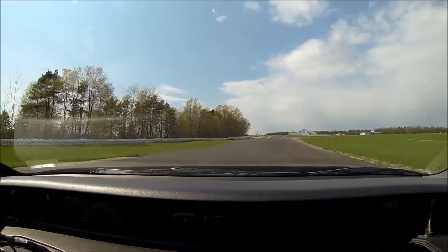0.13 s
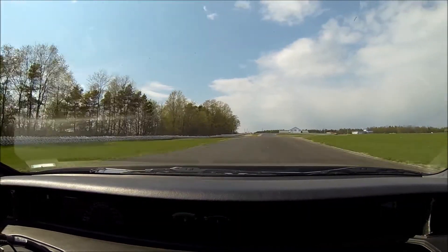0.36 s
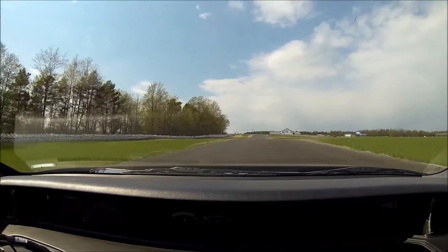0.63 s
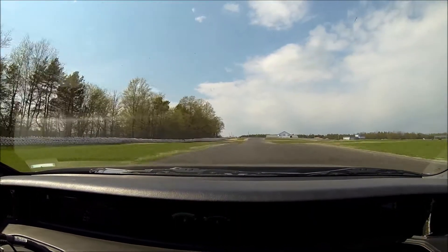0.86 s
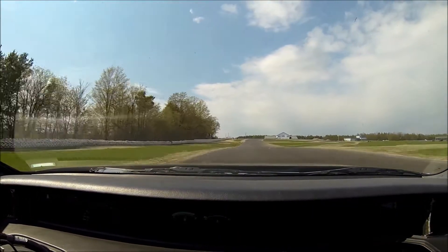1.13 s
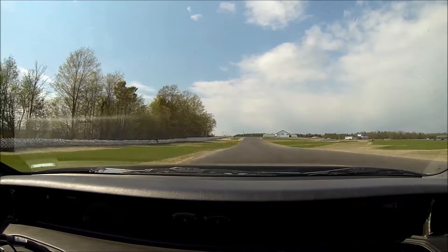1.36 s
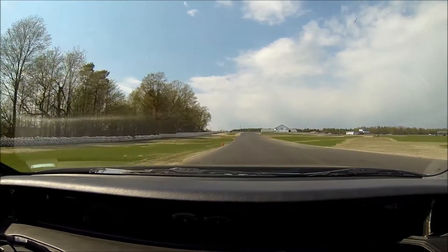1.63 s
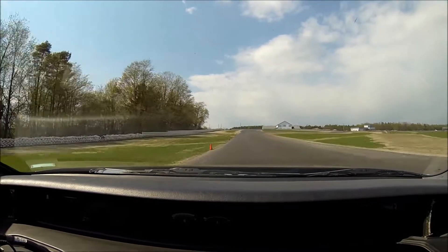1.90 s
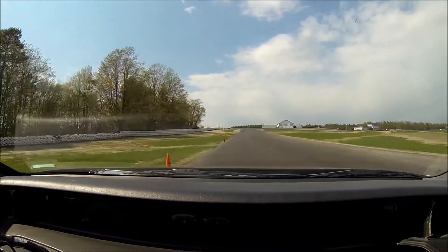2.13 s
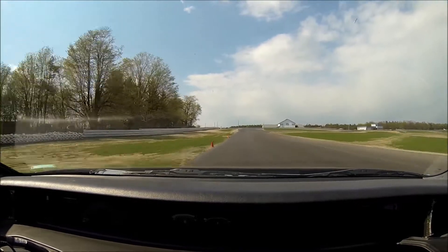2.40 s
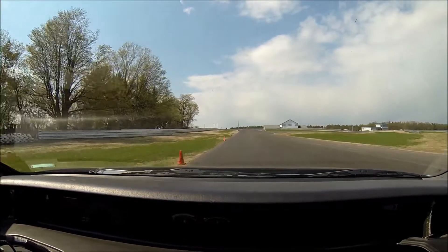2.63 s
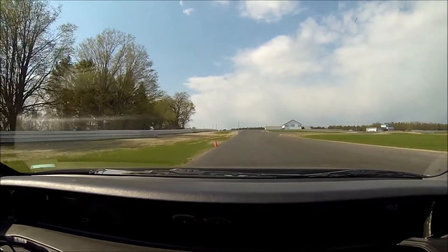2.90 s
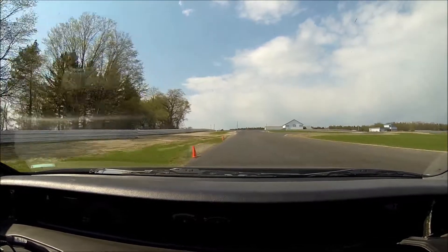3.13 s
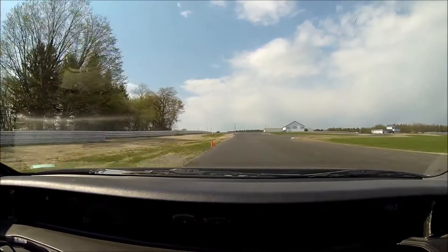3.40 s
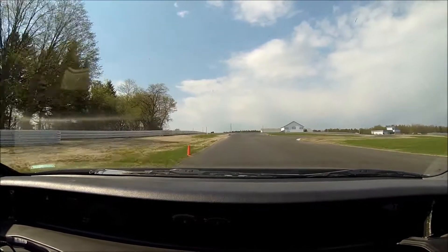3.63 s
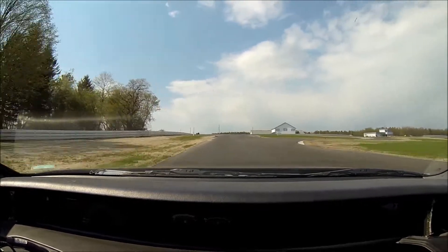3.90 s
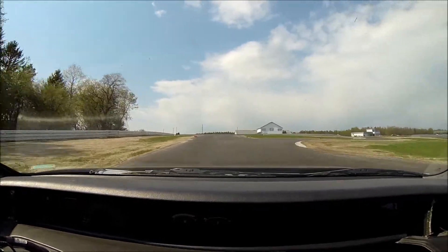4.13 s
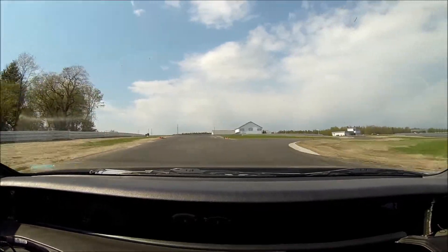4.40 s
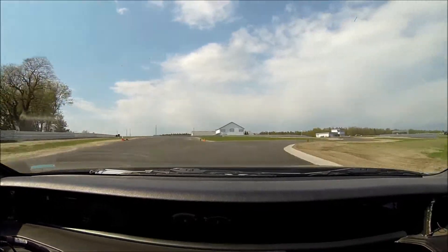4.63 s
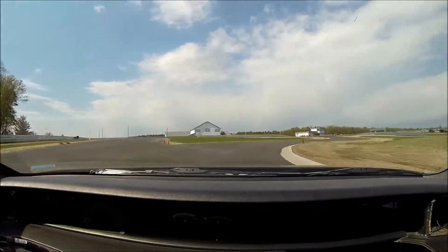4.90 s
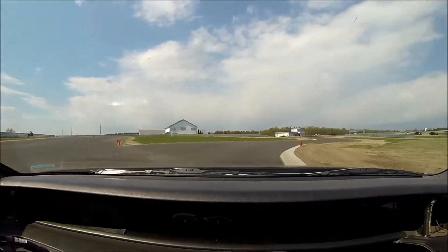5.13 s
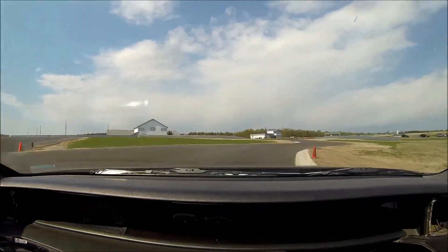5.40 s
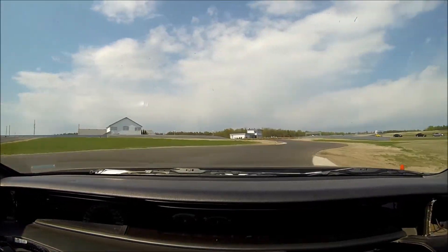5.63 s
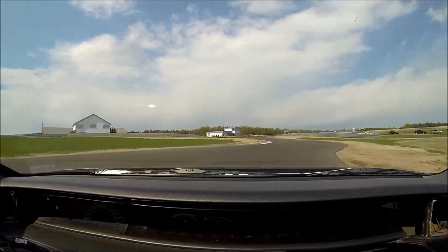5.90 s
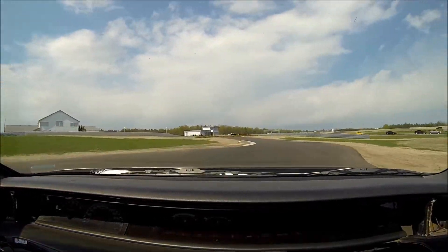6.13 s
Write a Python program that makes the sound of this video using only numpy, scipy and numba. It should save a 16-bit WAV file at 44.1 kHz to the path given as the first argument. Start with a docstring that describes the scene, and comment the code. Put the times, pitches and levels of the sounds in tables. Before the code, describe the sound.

Close, boomy cabin sound: loud raspy engine at full throttle, then an abrupt lift with a short burble and falling pitch. Very high, thin brake squeal accompanies slowing and a quick downshift blip. The engine settles into a steady lower drone as tyres begin to scrub, squeal and chirp. Road thumps and clicks throughout make the overloaded microphone level dip and swell back.

```python
"""Inside a four-cylinder car on a circuit: the engine pulls at full throttle over road rumble and gas noise.
The throttle shuts, the exhaust burbles up and the brakes squeal thinly; a blipped downshift drags the engine up.
Then the tyres scrub and chirp through a corner on the limit.
The engine is a sum of multiples of its cycle rate; squeals are tones in noise bands, the rest is shaped noise.
Jolts from the road push a gain control down throughout, and everything swells back after each."""
import sys
import numpy as np
from scipy import signal
from scipy.fft import rfft, irfft, next_fast_len
from scipy.io import wavfile
from scipy.ndimage import uniform_filter1d
from numba import njit

SR = 44100
rng = np.random.default_rng(int(sys.argv[2]) if len(sys.argv) > 2 else 0)


def generate_wav(signal):
    """Clip the signal to [-1, 1] and save it as 16-bit WAV at the path in sys.argv[1]."""
    frames = np.transpose(np.atleast_2d(signal))
    scaled = np.clip(frames, -1, 1) * 32767
    pcm = np.round(scaled).astype(np.int16)
    wavfile.write(sys.argv[1], SR, pcm)


def linear_from_db(decibels):
    """Turn decibels (scalar or array-like) into linear amplitude factors; 0 gives 1."""
    return 10 ** (np.asarray(decibels, float) / 20)


N = 276507
TIME = np.arange(N) / SR


def columns(table):
    """Linear interpolation: every column after the time becomes a value per sample."""
    s, *rest = np.transpose(table)
    return [np.interp(TIME, s, column) for column in rest]


def unit(x):
    """Normalisation: the signal scaled to rms 1."""
    return x / np.sqrt(np.mean(x ** 2))


def walk(rate):
    """Low-pass noise: random levels, rate per second, smoothed by two moving averages; rms 1."""
    hold = int(SR / rate)
    levels = np.repeat(rng.standard_normal(N // hold + 1), hold)
    smooth = uniform_filter1d(uniform_filter1d(levels, hold), hold)
    return unit(smooth[:N])


def coloured(points):
    """Spectral shaping: white noise filtered to a spectrum of (Hz, relative dB per Hz) points; rms 1."""
    size = next_fast_len(N)
    hz, db = np.transpose(points)
    bins_hz = np.arange(size // 2 + 1) * SR / size
    gain = linear_from_db(np.interp(np.log(bins_hz + 1), np.log(hz), db, right=-200))
    return unit(irfft(rfft(rng.standard_normal(size)) * gain, size)[:N])


def whine(hz, width_hz, rough):
    """Narrow-band noise: a steady tone on a moving pitch shares its power with a band around it."""
    turn = 2 * np.pi * np.cumsum(hz) / SR
    rough = np.clip(rough, 0, 1)  # share of the power in the noise band
    band = walk(width_hz) * np.cos(turn) + walk(width_hz) * np.sin(turn)
    steady = np.sin(turn + 2 * np.pi * rng.random())
    return np.sqrt(2 * (1 - rough)) * steady + np.sqrt(rough) * band


def bursts(table, waver):
    """Amplitude envelope: short tones swell and fade around their time, on a wavering pitch."""
    turn = 2 * np.pi * np.cumsum(waver) / SR
    out = np.zeros(N)
    for s, hz, length, db in table:
        span = slice(int((s - length) * SR), int((s + length) * SR))
        swell = np.exp(-(2 * (TIME[span] - s) / length) ** 4)
        out[span] += linear_from_db(db) * swell * np.sqrt(2) * np.sin(hz * turn[span])
    return out


def cabin_resonance():
    """Room modes: the gain of the cabin at each whole Hz, a sum of resonance peaks in dB."""
    # cabin resonances: centre_hz, width_hz, lift_db
    booms = [(281.8, 4.8, 6), (350.7, 8, 4.5), (478.8, 27.6, 11.5), (580, 12, 3.5), (1635, 220, 1.5)]
    scale = np.arange(3000.)
    return scale, linear_from_db(sum(db / (1 + (2 * (scale - f) / width) ** 2) for f, width, db in booms))


def engine():
    """Harmonic synthesis: cyclic firing sounds multiples of the cycle rate, governed by load and cabin modes."""
    # four-stroke cycle rate: start_s, rate_hz
    speed = [(0.0, 55.9), (0.2, 56.6), (0.33, 57.45), (0.47, 57.8), (0.55, 57.45), (0.68, 58.0),
             (0.96, 58.6), (1.1, 59.2), (1.24, 59.6), (1.33, 60.2), (1.53, 60.35), (1.58, 59.0),
             (1.65, 57.9), (1.72, 59.15), (1.87, 58.55), (1.95, 58.0), (2.2, 55.3), (2.3, 52.9),
             (2.42, 51.5), (2.52, 51.65), (2.72, 51.1), (2.84, 49.2), (3.05, 44.5), (3.16, 41.7),
             (3.25, 44.4), (3.34, 52.2), (3.41, 53.8), (3.56, 51.95), (3.84, 49.1), (4.0, 48.25),
             (4.15, 47.7), (4.28, 48.35), (4.4, 47.85), (4.48, 48.15), (4.61, 47.9), (4.68, 48.85),
             (4.75, 49.05), (4.88, 48.7), (4.99, 49.05), (5.15, 48.25), (5.24, 48.6), (5.36, 48.45),
             (5.47, 49.0), (5.6, 48.5), (5.95, 47.85), (6.27, 48.05)]
    # engine effort: start_s, load_db (relative to full throttle), firing_db (level of the firing tone)
    effort = [(0.0, -3, -24.5), (0.3, -1, -17), (1.22, 0.5, -15.5), (1.545, 0, -14.5), (1.58, -17, -22),
              (1.63, -20, -22), (1.69, -16, -17), (1.76, -12, -16), (1.95, -20, -16), (2.15, -1, -17),
              (2.44, -25, -23.5), (2.76, -15, -22), (3.05, -2.5, -8), (3.17, -23.5, -11),
              (3.33, -7.5, -20.5), (3.41, -10.5, -15.5), (3.72, -3.5, -14), (3.8, -14, -16),
              (4.14, -13.5, -11.5), (4.3, -6, -16), (4.49, -4, -14), (4.61, -2.5, -14.5), (4.67, -0.5, -16),
              (4.85, -1, -20.5), (5.08, -0.5, -21), (5.16, -1, -15), (5.3, -6, -16.5), (5.5, -2, -20),
              (6.05, -4.5, -16), (6.27, -4, -19)]
    # all other multiples of the cycle rate: multiple, high_gear_db, low_gear_db
    orders = [(1, -15, -6.5), (3, -17, -3.5), (5, -8, -24), (6, -10, -15.5), (7, -16, -22), (8, -8, -10.5),
              (9, -17, -28), (11, -16, -19), (12, -7, -9), (13, -22.5, -19), (14, -12.5, -16),
              (15, -10, -24), (17, -18, -19), (18, -9.5, -14), (19, -17.5, -20), (20, -26, -13),
              (21, -23, -25), (22, -27, -11), (23, -25, -19), (24, -27, -16), (25, -22, -29),
              (26, -23, -38), (27, -23, -27), (28, -35, -32), (29, -24, -33), (30, -26, -28),
              (31, -40, -38), (32, -25, -27), (33, -30, -30), (34, -28, -20), (36, -26, -31),
              (38, -35, -25), (41, -31, -28), (42, -33, -29), (43, -36, -40), (44, -40, -30),
              (45, -28, -40), (46, -35, -34), (48, -36, -37), (49, -32, -39), (50, -36, -35),
              (53, -36, -38), (54, -38, -33), (55, -37, -38)]
    # clean strong multiples (shaft beat, panel drumming, firing octave, third firing tone):
    # multiple, follow (dB lost per dB of load)
    strong = [(3, 2), (6, 2.5), (8, 1.5), (12, 2)]
    # multiples that keep sounding with the throttle shut: multiple, level_db
    coasting_table = [(3, -31), (6, -31.5), (8, -36.5), (12, -36), (14, -41), (18, -42.5)]
    # multiples while the wheels drag the engine up: multiple, start_db, end_db
    dragged_table = [(3, -19, -19), (6, -25.5, -22), (8, -28, -40), (12, -31.5, -30), (14, -34, -24.5),
                     (20, -42.5, -38.5)]
    # three clean multiples with a life of their own:
    # start_s, crank_db (multiple 2), exhaust_growl_db (multiple 10), intake_howl_db (multiple 16)
    voices = [(0.0, -26, -31.5, -40), (0.25, -24.5, -26.5, -30.5), (0.7, -21.5, -25.5, -33.5),
              (0.95, -22.5, -28, -26), (1.2, -22.5, -34, -22), (1.45, -38, -25.5, -30.5),
              (1.58, -32, -39, -45), (1.74, -19, -21, -39), (1.95, -25, -31, -45), (2.2, -21, -29, -24.5),
              (2.5, -21, -32, -41), (2.7, -33, -33.5, -29.5), (2.85, -38, -25.5, -49),
              (3.0, -41, -24.5, -35.5), (3.25, -28, -35, -41), (3.4, -18.5, -27, -33),
              (3.55, -15.5, -29, -24.5), (3.72, -16, -34, -34.5), (3.85, -22.5, -23, -37.5),
              (4.15, -31.5, -30, -40.5), (4.3, -20.5, -40.5, -31.5), (4.45, -21, -43.5, -18),
              (4.6, -19, -29.5, -17.5), (4.75, -19.5, -22, -20), (5.08, -16, -24.5, -17.5),
              (5.2, -21.5, -34.5, -21.5), (5.5, -23, -34.5, -24), (5.65, -20, -36.5, -21.5),
              (5.9, -23, -39, -25), (6.27, -21.5, -41, -19)]
    # rasp of the multiples above the 24th: start_s, gain_db
    rasp_table = [(0.0, -3), (0.5, 0), (0.95, 4), (1.26, 2.5), (1.33, -2), (1.7, 1), (4.4, 1), (4.8, 1.5),
                  (5.15, 0.5), (5.35, -7)]
    shift_s = 3.22, 3.36  # clutch out and in again
    lift_s, overrun_end_s = 1.55, 2.85  # throttle shut, from and to
    drag_s = 3.36, 3.75  # the clutch bites in the low gear and the wheels drag the engine up
    burble_s, burble_length_s, burble_db = 1.76, .07, 7.5  # the exhaust burbles up once after the lift
    full_load_db = -18  # added to every order

    (hz,), (load_db, firing_db) = columns(speed), columns(effort)
    follows, coasting = ({round(k): v for k, v in table} for table in (strong, coasting_table))
    dragged = {round(k): np.interp(TIME, drag_s, v) for k, *v in dragged_table}
    rasp, = linear_from_db(columns(rasp_table))
    pops_db = 1.8 * walk(35)  # uneven burning shakes the multiples together
    overrun = np.clip(np.minimum(TIME - lift_s, overrun_end_s - TIME) / 0.057, 0, 1)
    drag = np.clip(np.minimum(TIME - drag_s[0], drag_s[1] - TIME) / 0.024, 0, 1)
    slack = np.maximum(overrun, drag)
    shut = np.clip(-load_db / 9, 0, 1)  # how far the throttle is closed
    shut = shut * linear_from_db(burble_db * np.exp(-((TIME - burble_s) / burble_length_s) ** 2))
    scale_hz, cabin_gain = cabin_resonance()

    # four firings per cycle
    out = linear_from_db(firing_db) * whine(4 * hz, width_hz=22, rough=0.027 + 0.1 * overrun + .12 * drag)
    for k, db in zip((2, 10, 16), columns(voices)):
        size = linear_from_db(db + 1.0 * walk(9) + slack * pops_db)
        out = out + size * whine(k * hz, width_hz=22, rough=0.027 + 0.1 * overrun)
    for k, high_db, low_db in orders:
        k = round(k)
        gear_db = np.interp(TIME, shift_s, (high_db, low_db))
        size = linear_from_db(full_load_db + follows.get(k, 1) * load_db + gear_db + 0.9 * walk(5.9))
        if k > 24:
            size = size * rasp
        if k in coasting:
            size = np.hypot(size, shut * linear_from_db(coasting[k] + pops_db + 2.5 * walk(11)))
        if k in dragged:
            size = np.hypot(size, drag * linear_from_db(dragged[k] + pops_db + 1.5 * walk(8)))
        if k in follows:
            rough = 0.027 + 0.2 * overrun + 0.15 * drag
        else:
            rough = .03 + .2 * slack
        resonance = np.interp(k * hz, scale_hz, cabin_gain)
        out = out + size * resonance * whine(k * hz, width_hz=21, rough=rough)
    cycle = 2 * np.pi * np.cumsum(hz) / SR  # phase of the engine cycle (rad)
    return out, cycle


def jolts(push_s=0.0026, thud_s=0.0022, boom_hz=30, boom_s=0.032, boom=0.74, click_db=-49, click_s=0.0023):
    """Impulse response: a bump squeezes the cabin air, a sharp click sounds at each jolt, then the body rings,
    damped."""
    # jolts from the road: start_s (time of the peak), peak_db, direction (up 1 or down -1)
    bumps = [(0.052, 4, -1), (0.458, 5.5, 1), (0.688, 3, -1), (1.056, 0, 1), (1.287, 6.5, -1),
             (1.556, 0.5, -1), (1.799, 5, -1), (1.922, 4.5, -1), (2.142, 3.5, 1), (2.358, -6, -1),
             (2.416, -2.5, -1), (2.514, 5.5, 1), (2.758, 4.5, 1), (2.883, 4.5, 1), (2.964, 5.5, -1),
             (3.067, 2.5, 1), (3.218, -1, -1), (3.409, -1.5, -1), (3.599, 1.5, -1), (3.741, 3, -1),
             (3.95, -5, 1), (4.197, -0.5, 1), (4.349, 5, -1), (5.167, -6, 1), (5.47, 2.5, -1),
             (5.729, -1.5, -1), (5.962, 1.5, -1), (6.133, -3.5, 1), (6.213, -1.5, -1)]
    # spectrum of the sharp click at each jolt: frequency_hz, relative_db_per_hz
    click_spectrum = [(1500, -27), (3000, -6), (6000, -12.5), (12000, -25), (15000, -38.5)]
    out, click_noise = 0, linear_from_db(click_db) * coloured(click_spectrum)
    for s, db, direction in bumps:
        t = TIME - s
        rise = np.exp(-np.clip(t / push_s, -9, 0) ** 2)
        after = np.maximum(t, 0)
        thud = np.exp(-(after / thud_s) ** 2)
        ring = np.exp(-after / boom_s) * np.cos(2 * np.pi * boom_hz * t)
        push = np.sign(direction) * rise * ((1 - boom) * thud + boom * ring)
        click = np.exp(-np.abs(t) / click_s) * click_noise
        out = out + linear_from_db(db) * (push + click)
    return out


def tyres():
    """Stick-slip friction: tread blocks give smeared squeals at their own pitches, and short clearer chirps."""
    # tyres scrubbing in the corner: start_s, level_db
    scrub = [(4.3, -35), (4.8, -32), (5.1, -24.5), (5.6, -23.5), (5.95, -24.5), (6.27, -27.5)]
    # pitches the tread judders and squeals at: pitch_hz, width_hz, level_db (relative to the scrub)
    tread = [(71.85, 45, 2), (976, 270, -4.5), (1053, 120, -6.5), (1120, 110, -8.5), (2702, 1800, -13),
             (1645, 700, -11.5), (1234, 70, -14), (1402, 83, -12), (1965, 90, -13.5), (2085, 90, -13.5)]
    # single chirps where a tread block sings out: centre_s, pitch_hz, length_s, level_db
    chirps = [(4.301, 1954, 0.075, -50), (4.45, 1975, 0.063, -36), (4.473, 1158, 0.1, -30.5),
              (4.83, 1172, 0.11, -29.5), (5.07, 1120, .08, -31), (5.149, 1972, 0.073, -27),
              (5.213, 1965, 0.047, -28.5), (5.207, 1430, 0.14, -35.5), (5.235, 2066, 0.062, -37),
              (5.235, 1190, .05, -34), (5.36, 2076, .1, -38.5), (5.334, 1385, 0.065, -31),
              (5.41, 1032, 0.06, -31), (5.472, 1060, 0.04, -30), (5.585, 1056, 0.042, -31),
              (5.59, 980, 0.062, -26.5), (5.634, 2085, 0.079, -36.5), (5.644, 1034, 0.098, -31.5),
              (5.776, 2137, 0.075, -32.5), (5.834, 1097, 0.047, -16), (5.885, 2092, 0.11, -28),
              (5.915, 1096, 0.041, -19), (5.933, 1306, 0.051, -32), (6.04, 1000, 0.11, -26)]
    scrub_db, = columns(scrub)
    grip = np.clip((TIME - scrub[0][0]) / .2, 0, 1)  # the squeals fade in over 0.2 s
    chatter_db = 1.3 * walk(35)
    squeals = 0
    for hz, width_hz, db in tread:
        size = linear_from_db(scrub_db + db + chatter_db + 1.2 * walk(13))
        squeals = squeals + size * whine(hz * (1 + .008 * walk(14)), width_hz, rough=0.94)
    waver = 1 + .007 * walk(50)
    flutter = linear_from_db(.7 * chatter_db + 2.5 * walk(70))
    return grip * squeals + flutter * bursts(chirps, waver)


def brakes():
    """Friction-induced vibration: pads sing faintly on the discs, a wavering core in a wide fuzz."""
    # brake squeal: start_s, centre_hz, level_db (of the core)
    squeal = [(1.95, 9610, -70), (2.11, 9800, -57), (2.2, 10400, -64), (2.32, 10900, -64),
              (2.45, 10160, -70), (2.7, 9880, -61), (2.8, 9936, -63), (3.05, 9920, -55), (3.12, 9850, -66),
              (3.48, 9500, -60), (3.65, 9700, -76)]
    hz, db = columns(squeal)
    pedal = np.clip(np.minimum(TIME - squeal[0][0], squeal[-1][0] - TIME) / 0.071, 0, 1)
    core = whine(hz * (1 + .008 * walk(30)), width_hz=350, rough=0.85)
    fuzz = linear_from_db(-1) * whine(hz, width_hz=1500, rough=0.92)
    return pedal * linear_from_db(db + 1.7 * walk(44) + 2.0 * walk(7.3)) * (core + fuzz)


def body_shell():
    """Structural resonance: the shell booms on its lowest note, a wandering narrow band."""
    # the boom: start_s, pitch_hz, level_db
    body = [(0.0, 26.95, -19), (0.6, 26.17, -19), (1.15, 27.99, -21), (1.35, 26.45, -10.5),
            (1.55, 28.9, -13.5), (1.72, 29.08, -23), (1.85, 28.94, -16.5), (2.3, 25.53, -20),
            (2.65, 32.02, -18), (3.1, 31.07, -13.5), (3.45, 25.85, -26.5), (3.8, 27.26, -13.5),
            (4.15, 24.69, -21.5), (4.5, 23.84, -31), (5.0, 24.25, -26), (5.3, 27.12, -11),
            (5.7, 26.99, -25.5), (6.27, 26.45, -22)]
    hz, db = columns(body)
    return linear_from_db(db) * whine(hz, width_hz=8.2, rough=0.21)


def low_bursts():
    """Amplitude envelope: brief swells of the engine's third multiple near 155 Hz, road thuds near 100 Hz."""
    # low thuds and swells: centre_s, pitch_hz, length_s, level_db
    swells = [(2.255, 99.7, 0.05, -18.5), (2.345, 156, 0.073, -19), (2.46, 153, 0.17, -21.5),
              (2.59, 111.3, 0.041, -20), (2.745, 103.9, 0.072, -15), (4.22, 111.6, 0.12, -18.5),
              (4.32, 89.5, .08, -21.5)]
    return bursts(swells, 1 + .03 * walk(30.03))


def road_rumble(level_db):
    """Random excitation: low-frequency road noise whose level comes in lumps."""
    # spectrum of the rumble: frequency_hz, relative_db_per_hz
    rumble_spectrum = [(10, -42.5), (18, 6), (24, 3), (33, 5), (45, 7), (70, -3), (130, -14), (250, -20),
                       (400, -61)]
    return linear_from_db(level_db + 1.5 * walk(6)) * coloured(rumble_spectrum)


def panels_and_gas(roar_db, cycle):
    """Amplitude modulation: panel drone and gas noise pulse with the engine cycle; hiss follows the roar."""
    # spectrum of the panel drone: frequency_hz, relative_db_per_hz
    drone_spectrum = [(50, -30.5), (90, -13.5), (160, -2), (250, -9), (350, -7.5), (600, -9.5),
                      (1050, -13.5), (1250, -22.5), (2000, -28.5), (3200, -56)]
    # spectrum of the gas noise: frequency_hz, relative_db_per_hz
    gas_spectrum = [(600, -23.5), (1000, -7), (1300, -12.5), (1700, -7.5), (2200, -12.5), (3000, -12.5),
                    (4200, -23), (5000, -28.5), (6300, -33.5), (7500, -45), (11000, -74.5)]
    # spectrum of the hiss: frequency_hz, relative_db_per_hz
    hiss_spectrum = [(5000, -13.5), (7000, -3.5), (9500, -1.5), (12000, -9), (14000, -12), (15000, -29.5)]
    drone_db, drone_follows = -22, 0.39  # level at a roar of -33 dB; dB per dB of roar
    hiss_db, hiss_follows = -59, 1.1  # the same for the hiss
    shake = walk(40)  # drone, gas and hiss flicker together
    swing_db = roar_db + 33
    # cycle: once per engine cycle, 2: each crank turn, 4: each firing
    throb = 1 + .15 * np.cos(2 * cycle) + .1 * np.cos(cycle)
    puffs = 1 + 0.042 * np.cos(2 * cycle) + 0.049 * np.cos(4 * cycle) + 0.024 * np.cos(cycle)
    drone = linear_from_db(drone_db + drone_follows * swing_db + 0.5 * shake) * throb * coloured(drone_spectrum)
    gas = linear_from_db(roar_db + 0.64 * shake + 0.73 * walk(150)) * puffs * coloured(gas_spectrum)
    hiss = linear_from_db(hiss_db + hiss_follows * swing_db + 0.73 * shake) * coloured(hiss_spectrum)
    return drone + gas + hiss


def cabin(cycle):
    """Superposition: road rumble, shell boom, low bursts, panel drone and gas noise add in the cabin."""
    # cabin noise: start_s, rumble_db, roar_db (gas roar)
    noise = [(0.0, -30.5, -38), (0.17, -15, -33.5), (1.15, -14.5, -30.5), (1.4, -7, -30.5),
             (1.62, -9.5, -31.5), (1.76, -11.5, -31), (1.95, -13, -34.5), (2.3, -14, -31.5),
             (2.45, -11, -35.5), (2.54, -8.5, -35.5), (2.72, -14, -36), (3.14, -15, -37), (3.32, -8.5, -38),
             (3.39, -21.5, -32), (3.52, -14, -35), (3.72, -21, -32.5), (3.8, -19.5, -39.5),
             (4.4, -18.5, -39), (4.75, -18.5, -34), (5.4, -25.5, -34.5), (5.62, -22.5, -37),
             (6.0, -12, -37.5), (6.27, -19, -36.5)]
    rumble_db, roar_db = columns(noise)
    return road_rumble(rumble_db) + body_shell() + low_bursts() + panels_and_gas(roar_db, cycle)


def scene():
    """Superposition: all sources add at one point, the steady ones raised 3 dB against the jolts."""
    tones, cycle = engine()
    steady = tones + cabin(cycle) + tyres() + brakes()
    return (linear_from_db(3.0) * steady + jolts())[None]


@njit
def ride(x, top, attack, release_db):
    """Peak limiting: gain dives when a peak passes the top, and climbs back at a steady dB per sample."""
    y, gain, climb = np.empty(len(x)), 1., 10 ** (release_db / 20)
    for i in range(len(x)):
        if abs(x[i]) * gain > top:
            gain += attack * (top / abs(x[i]) - gain)
        else:
            gain = min(gain * climb, 1.)
        y[i] = gain * x[i]
    return y


def low_pass(x):
    """Removes everything above the highest recorded frequency."""
    return signal.sosfilt(signal.butter(12, 14950, fs=SR, output="sos"), x)


def record(dry):
    """Automatic gain control: the level is ridden on the peaks, with a 0.6 ms attack and 44.5 dB/s release."""
    held = ride(dry[0], top=0.43, attack=1 / (.0006 * SR), release_db=44.5 / SR)
    return low_pass(held[None])


dry = scene()
out = record(dry)
generate_wav(out)
```